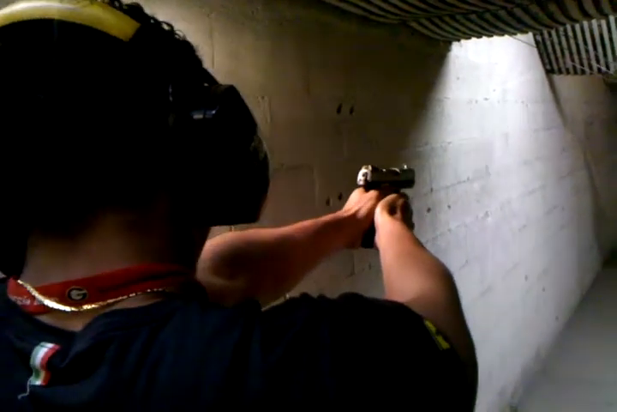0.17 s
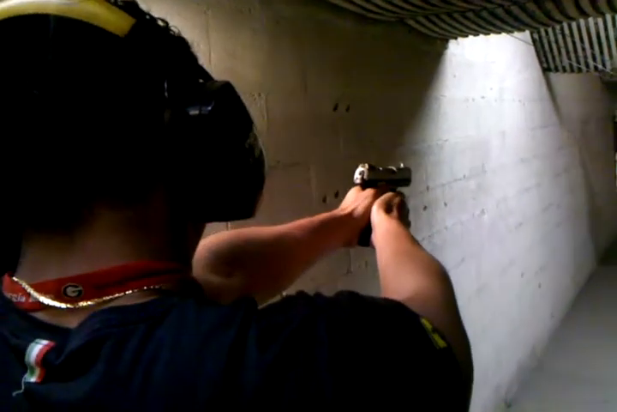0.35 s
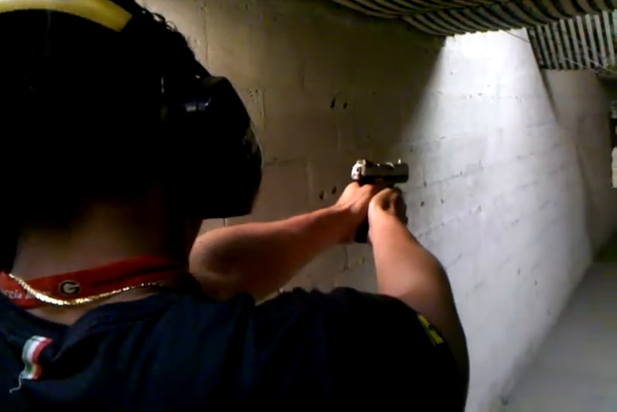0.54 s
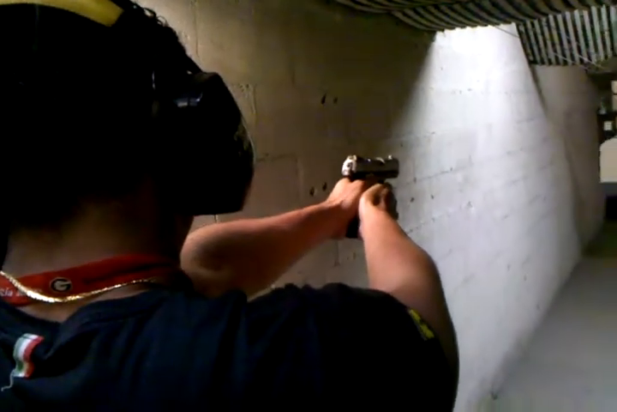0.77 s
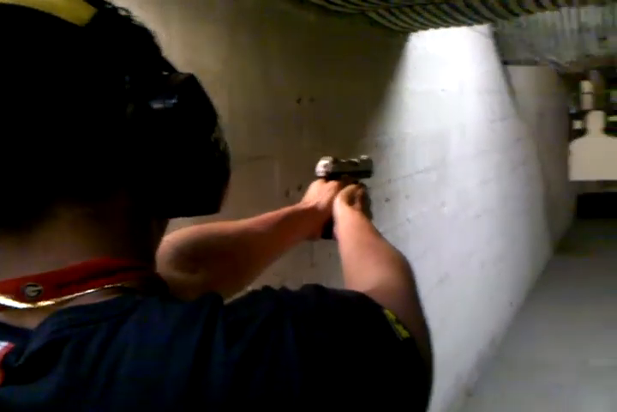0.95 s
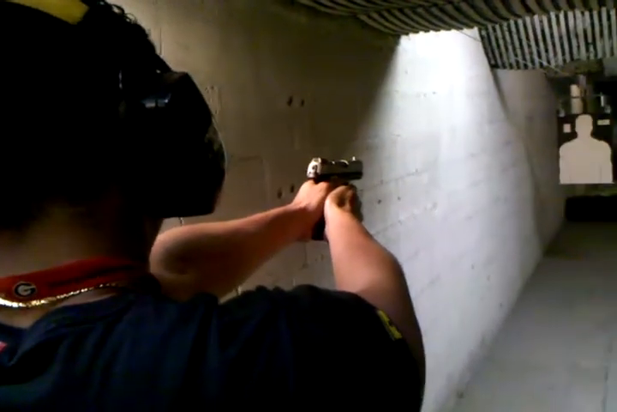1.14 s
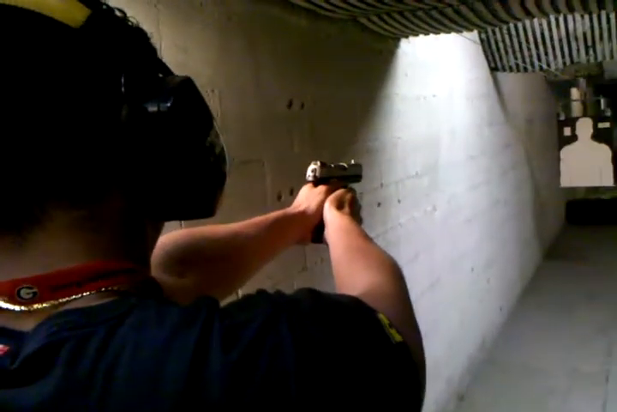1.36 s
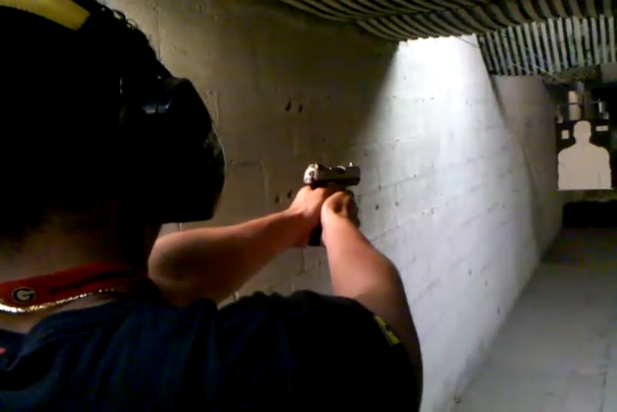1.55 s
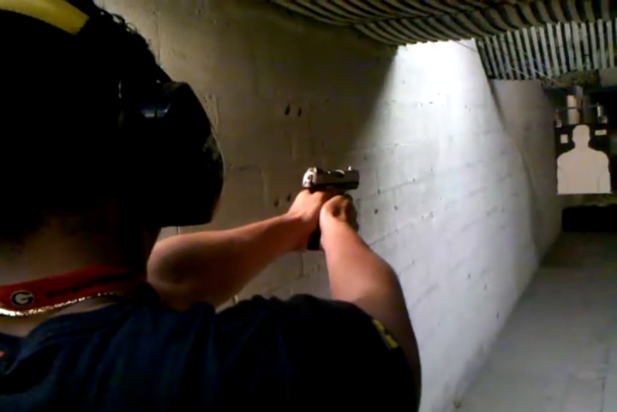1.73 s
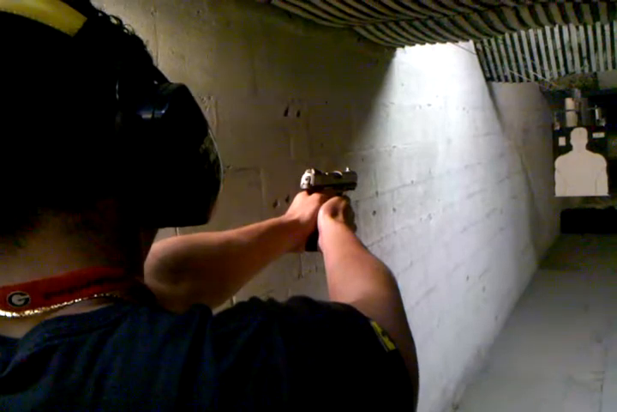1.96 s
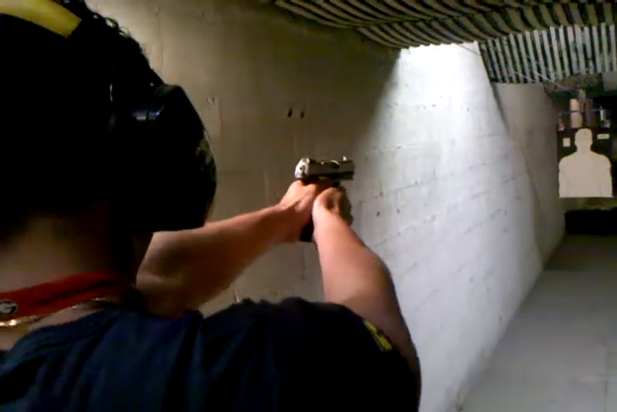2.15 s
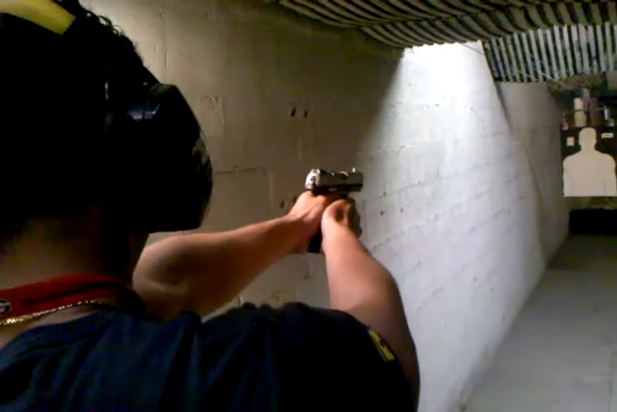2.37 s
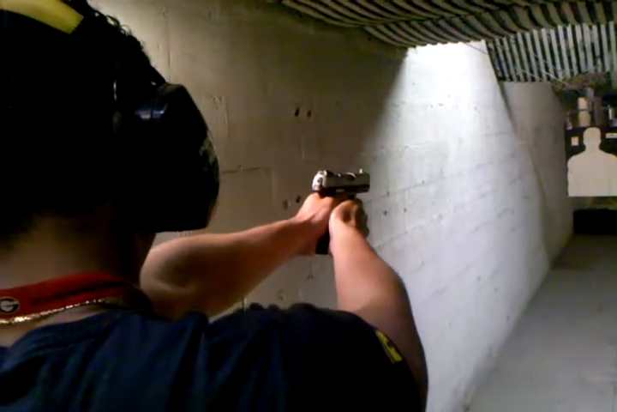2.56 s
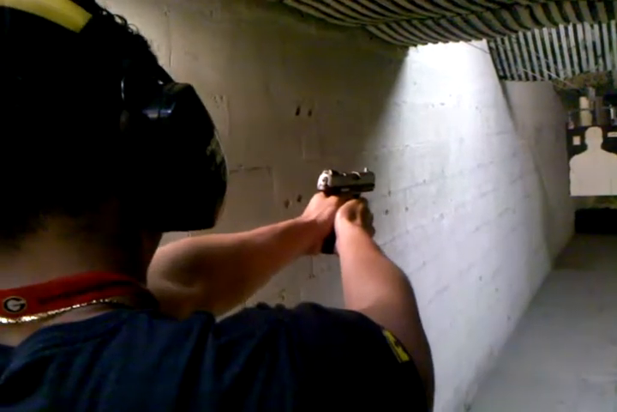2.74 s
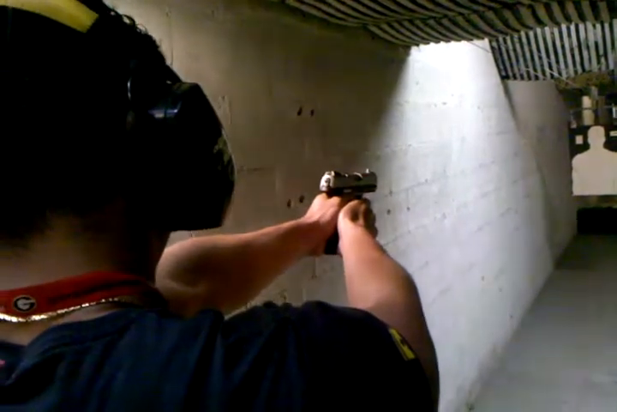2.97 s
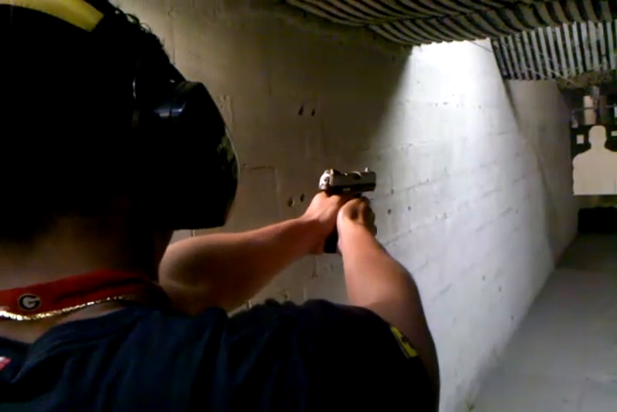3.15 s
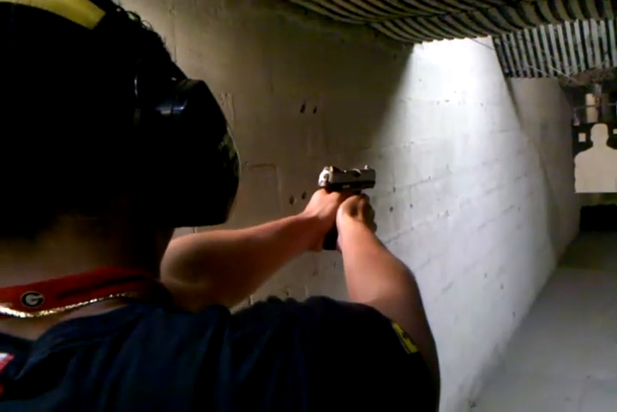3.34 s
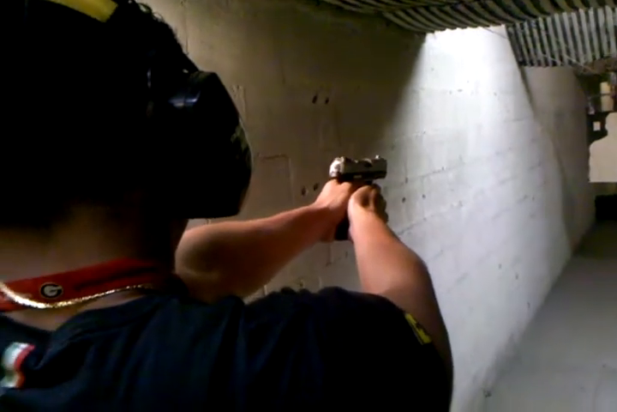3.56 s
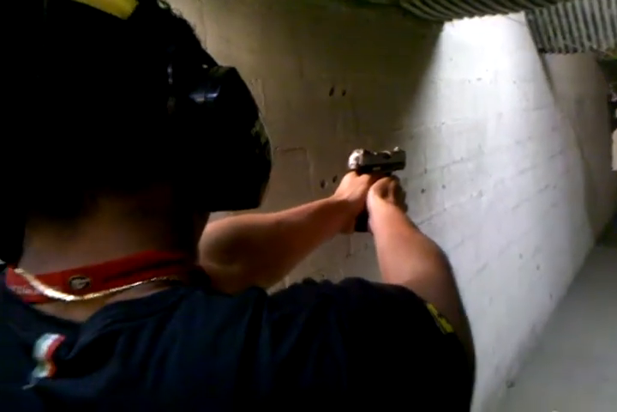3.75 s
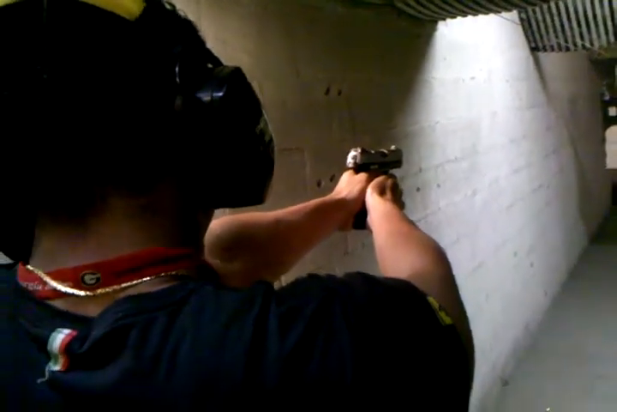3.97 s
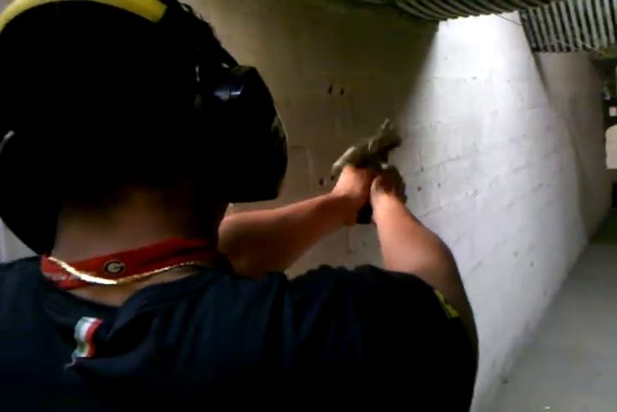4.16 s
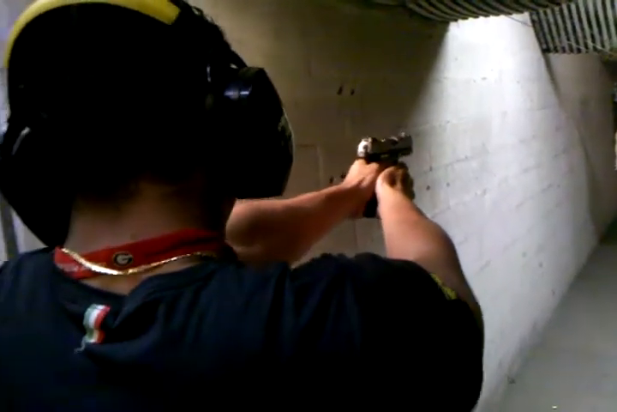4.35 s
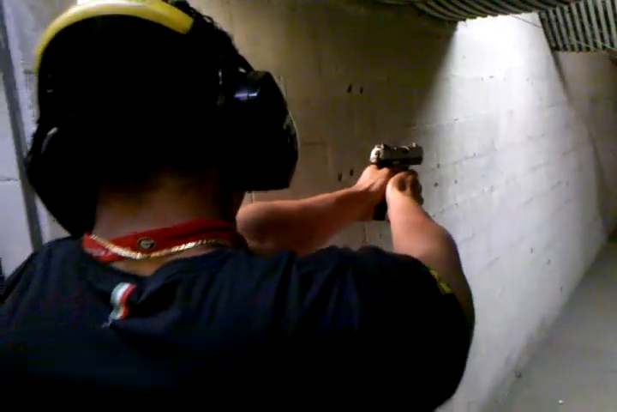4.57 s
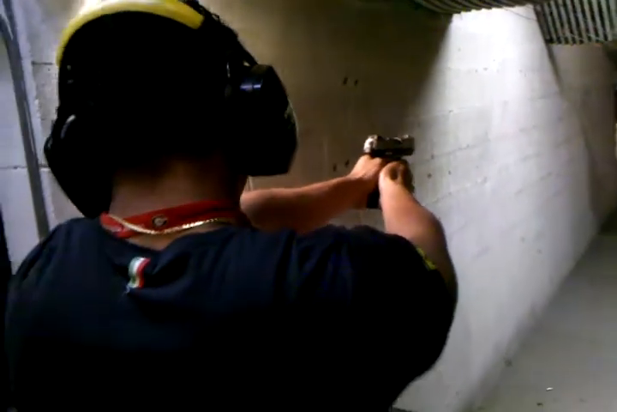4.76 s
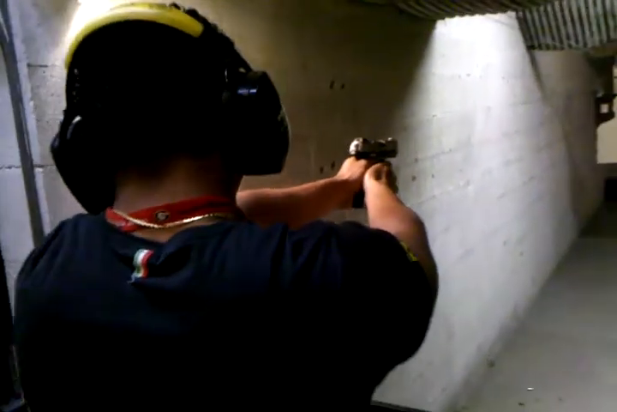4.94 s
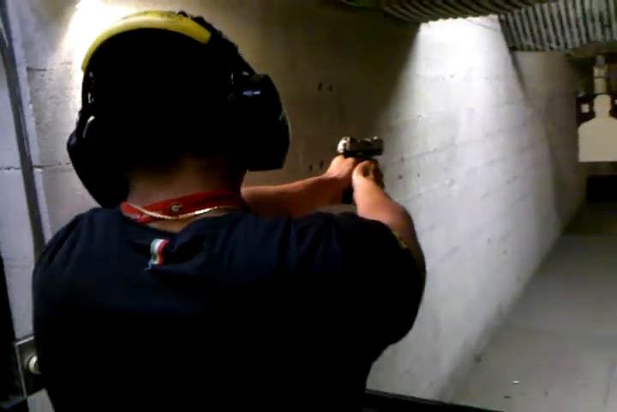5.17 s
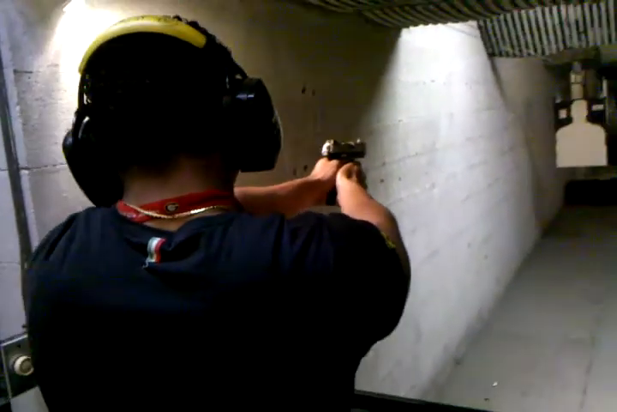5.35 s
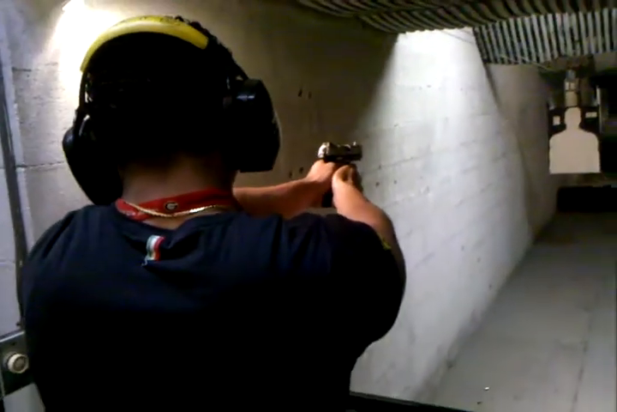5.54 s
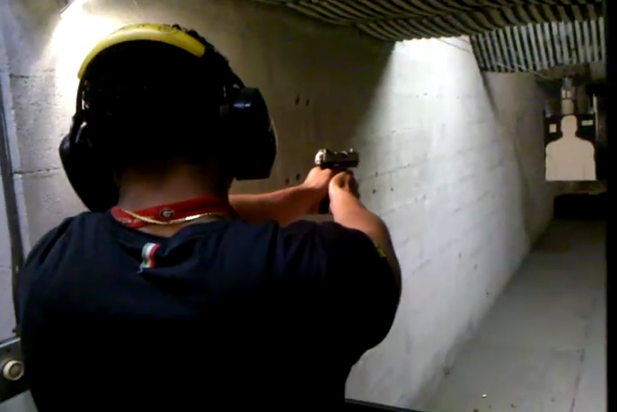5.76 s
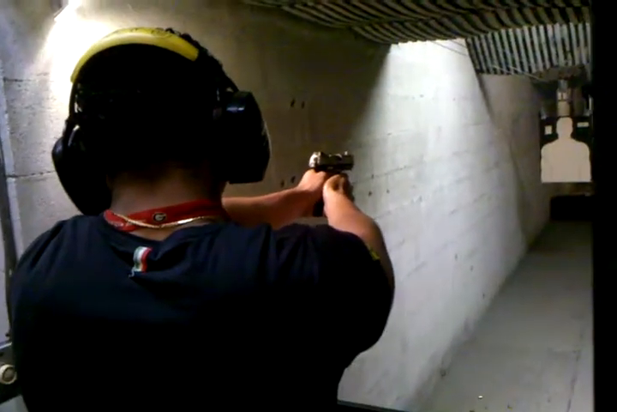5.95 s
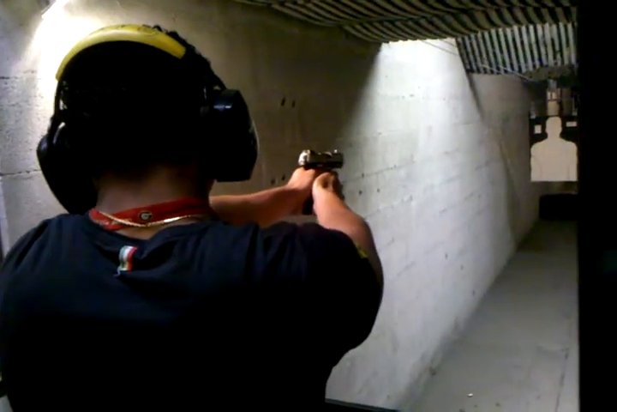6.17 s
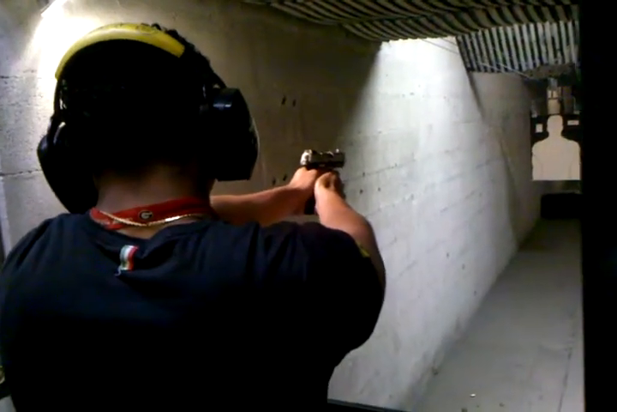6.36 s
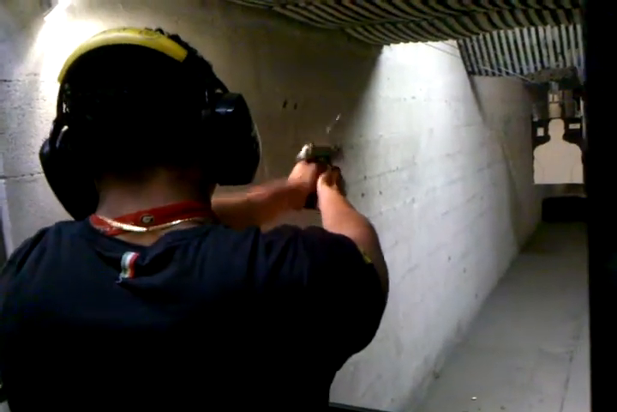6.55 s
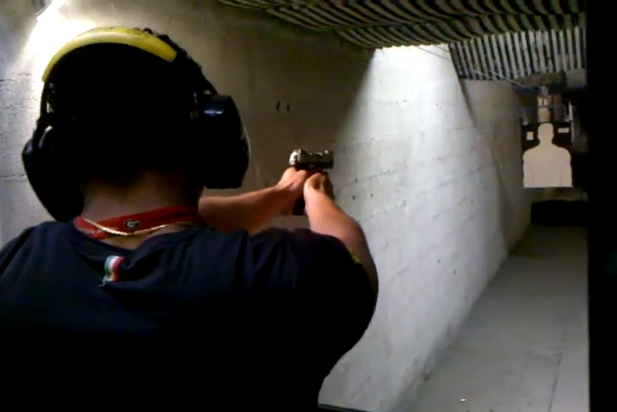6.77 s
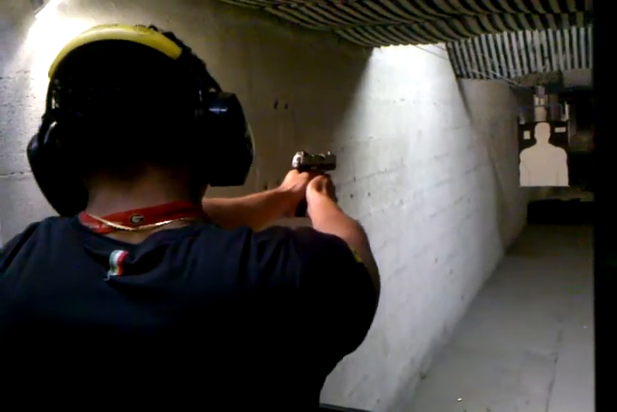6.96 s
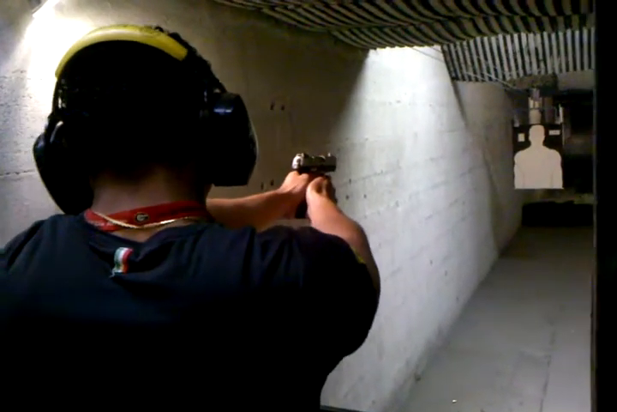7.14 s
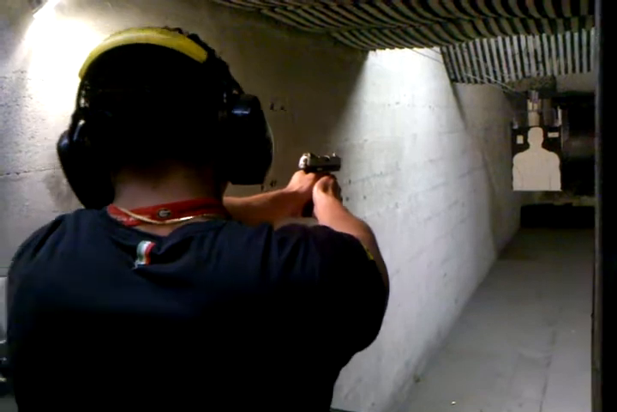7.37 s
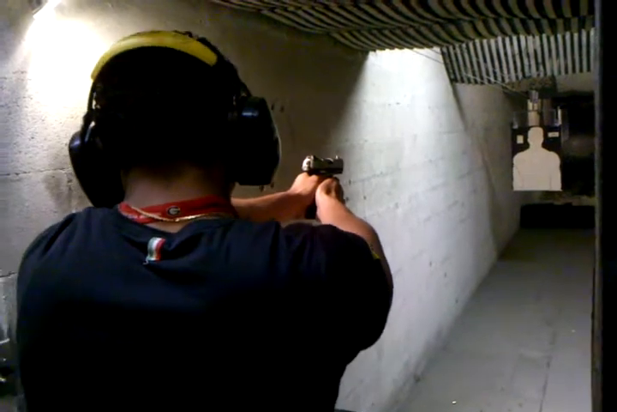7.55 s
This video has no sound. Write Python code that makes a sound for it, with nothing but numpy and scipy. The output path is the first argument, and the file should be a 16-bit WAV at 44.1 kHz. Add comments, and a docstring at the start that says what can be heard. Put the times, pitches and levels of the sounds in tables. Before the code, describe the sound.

The sound opens inside the loud echo of a pistol shot just fired in an indoor concrete range. A spent brass casing clinks and bounces on the floor from about 0.2 to 0.8 seconds, then ticks and rolls faintly. The pistol fires again at about 2.0, 4.1 and 6.4 seconds. Each shot has a faint trigger click just ahead of it, a bright crack, and a swelling echo that overloads the small, close microphone for half a second before ringing away. Casings bounce lightly from 2.8 to 3.3 seconds. One lands sharply at 4.7 seconds, with more clinks and a soft roll until about 6 seconds, and a few last light clinks come around 7.3 to 7.5 seconds. A faint, low ventilation hum runs throughout, showing as the echoes die. The whole sound is somewhat narrow, without deep bass or very high treble.

```python
"""A long concrete shooting lane, heard from the firing booth through a small microphone.
We come in on the echoes of a pistol shot fired just before the start. Spent brass bounces and rolls
on the floor, and the low rumble of the ventilation shows as the echoes die. Three more shots follow
about two seconds apart, each with a faint trigger click, a bright crack, echoes that overload
the microphone for half a second, and then more clinking casings."""
import sys
import numpy as np
from scipy import signal
from scipy.io import wavfile

SR = 44100
rng = np.random.default_rng(int(sys.argv[2]) if len(sys.argv) > 2 else 0)


def inscribe(sig):
    """Save sig as 16-bit PCM at rate SR to the path in sys.argv[1].

    A 1-D sig is mono; a 2-D sig holds one channel per row.
    Samples are clipped to [-1, 1] before scaling.
    """
    pcm = np.round(np.clip(np.atleast_2d(sig).T, -1, 1) * 32767)
    wavfile.write(sys.argv[1], SR, pcm.astype(np.int16))


N = 335601


def gain_of(db):
    """Decibels to an amplitude factor."""
    return 10 ** (np.asarray(db) / 20)


def unit_rms(x):
    """Scales a signal to an rms of one."""
    return x / np.sqrt(np.mean(x ** 2) + 1e-20)


def curve(table, hz, column=1):
    """One column of a table, interpolated on a log-frequency axis."""
    columns = np.transpose(table)
    return np.interp(np.log(hz + 1), np.log(columns[0] + 1), columns[column])[:, None]


def add(mix, start_s, sound):
    """Mixes a sound in at start_s, which may lie before the start."""
    at = round(start_s * SR)
    sound = sound[max(-at, 0):]
    part = mix[max(at, 0):][:len(sound)]
    part += sound[:len(part)]


def noise(magnitude, count):
    """Noise whose spectrum follows magnitude(t, hz)."""
    t = np.arange(count // 256 + 5) * 256 / SR
    hz = np.fft.rfftfreq(1024, 1 / SR)
    real, imag = rng.standard_normal((len(t), len(hz), 2)).T
    return signal.istft((real + 1j * imag) * magnitude(t, hz), nperseg=1024, noverlap=768)[1][:count]


def crack(t):
    """The pistol close by: a bright burst before the lane fills with echoes."""
    # spectrum of the crack: frequency_hz, density_db
    spectrum = [(88, -34), (150, -8), (1470, -3.5), (2130, -2), (3400, -1), (5410, -3.5), (6250, -1.5),
                (7000, -6.5), (9100, -37), (15400, -120)]
    level_db, t60_s = -5.5, .4
    burst = unit_rms(noise(lambda t, hz: gain_of(curve(spectrum, hz)), count=len(t)))
    return gain_of(level_db - 60 * t / t60_s) * burst


def lane_echoes(t, hz):
    """Echo spectrum over time: treble arrives at once and dies first; bass piles up and lingers."""
    # colour of the echoes: frequency_hz, density_db
    spectrum = [(60, -25), (130, -24), (250, -14.5), (340, -5), (430, -3.5), (700, -2), (1100, -2.5),
                (1900, -11), (2900, -16.5), (4500, -19.5), (6600, -23.5)]
    # how the lane empties and fills: frequency_hz, t60_s, build_up_s
    lane = [(100, 1.2, 0.17), (300, 0.93, 0.16), (700, 0.89, 0.23), (1500, 0.86, 0.078), (3000, 0.89, 0.02),
            (5250, 0.72, 0.011), (7350, 0.65, 0.012)]
    # weaker, slower tail from the far end: frequency_hz, density_db
    far_end = [(200, -66.5), (350, -55), (1000, -51.5), (1600, -47.5), (2100, -63), (2900, -53.5),
               (4000, -65), (6000, -82)]
    far_t60_s = 2.435
    colour = gain_of(curve(spectrum, hz))
    build_up = 1 - 0.72 * np.exp(-t / curve(lane, hz, column=2))
    near = colour * build_up * gain_of(-60 * t / curve(lane, hz))
    far = gain_of(curve(far_end, hz) - 60 * t / far_t60_s)
    return np.hypot(near, far) / np.linalg.norm(colour)


def standing_waves(t):
    """Each standing wave in the lane is a cluster of close partials that beat as they die."""
    # lingering resonances: pitch_hz, width_hz, relative_db, t60_s
    lane_modes = [(327.8, 30, -21, 1.175), (745, 68, -50, 1.9), (919, 17, -53, 2.3), (990, 38, -52, 2.02)]
    build_up_s = 0.082
    out = np.zeros(len(t))
    for hz, width, db, t60 in lane_modes:
        detune, phase = rng.random((16, 2, 1)).transpose(1, 0, 2)
        partial_hz = hz + 2 * width * (detune - .5)
        cluster = np.sin(2 * np.pi * (partial_hz * t + phase)).sum(0)
        out += gain_of(db - 60 * t / t60) * unit_rms(cluster)
    return out * (1 - np.exp(-t / build_up_s))


def pistol_shots():
    """Each shot cracks, then its echoes pile up far above the crack."""
    # shots: start_s
    shot_times = [-.35, 1.9673, 4.111, 6.4461]
    echo_gain_db, fill_s, onset_s = 23, .15, .005
    out, t = np.zeros(N), np.arange(3 * SR) / SR
    onset = gain_of(-45 * np.maximum(1 - t / onset_s, 0))
    filling = np.minimum(t / fill_s, 1) ** 1.5
    for start_s in shot_times:
        direct = crack(t)
        echoes = noise(lane_echoes, count=len(t)) + standing_waves(t)
        add(out, start_s - onset_s, onset * (direct + gain_of(echo_gain_db) * filling * echoes))
    return out


def ventilation():
    """Steady air noise, strongest in the bass."""
    # spectrum of the moving air: frequency_hz, density_db
    air = [(35, -74.5), (60, -43), (128, -4), (215, -1.5), (295, -25.5), (398, -10.5), (431, -25.5),
           (709, -17.5), (799, -27), (937, -20), (7000, -44.5), (9100, -90), (15400, -120)]
    return gain_of(-53) * unit_rms(noise(lambda t, hz: gain_of(curve(air, hz)), count=N))


def clink(peak_db, hardness, spread_octaves=.95, rattle_s=.0024):
    """A sharp contact and a rattle drive heavily damped modes; harder blows ring higher."""
    # modes of brass on concrete: pitch_hz, level_db, t60_s
    brass = [(1400, 0, .0035), (1900, 0, .0035), (2400, 0, .003), (3080, 0, .004), (3650, 0, .0025),
             (4300, 0, .0025), (5050, 0, .0025), (5800, 0, .0022), (6500, 1, .0025), (7200, 0, .0022)]
    hz, mode_db, t60 = np.transpose(brass)[:, :, None]
    t = np.arange(12000) / SR
    ring_t = t[:1000]
    sign = (-1) ** np.arange(len(brass))[:, None]  # neighbouring modes swing in opposite senses
    centre_hz = 1200 * 6 ** hardness
    share = .07 + np.exp(-.5 * (np.log2(hz / centre_hz) / spread_octaves) ** 2)
    detuned_hz = hz * (1 + .015 * rng.standard_normal(hz.shape))
    ring = sign * share * gain_of(mode_db - 60 * ring_t / t60) * np.sin(2 * np.pi * detuned_hz * ring_t)
    ring *= np.minimum(ring_t * hz, 1)  # each mode builds over one cycle, so no thud leaks below it
    blows = rng.standard_normal(len(t)) * np.exp(-t / rattle_s) * np.minimum(t / .0015, 1)
    blows[0] = 8.5  # the first contact
    sound = signal.oaconvolve(blows, ring.sum(0))
    return gain_of(peak_db) * sound / abs(sound).max()


def bouncing_casings():
    """Spent brass lands and bounces on the concrete, one clink a contact."""
    # contacts: start_s, peak_db, hardness (0-1), spread_octaves
    bounces = [(.1865, -5.5, .9, .22), (.205, -11, .38, .42), (.345, -27, .68, .2), (.4275, -22, .74, .25),
               (.4948, -16, .2, .5), (.5472, -28, .6, .8), (.648, -31, .2, .5), (.7526, -13, .5, .7),
               (.8206, -21, .53, .1), (1.338, -55, .83, .28), (1.531, -45, .95, .6),
               (2.7597, -25, .75, .37), (3.079, -35.5, .82, .4), (3.2027, -45, .87, .4),
               (3.286, -52, .88, .3), (3.335, -54, .9, .3), (4.7148, -1, .3, 1.05), (5.069, -47, .99, .15),
               (5.089, -50, .95, .15), (5.152, -50, .95, .15), (5.312, -15.5, .77, .35),
               (5.5912, -15, .55, 1.2), (5.8002, -22, .5, 1.1), (5.93, -43, .15, .5),
               (7.2565, -27, .86, .25), (7.478, -50, .92, .15), (7.507, -46, .95, .15),
               (7.523, -50, .92, .2)]
    out = np.zeros(N)
    for start_s, peak_db, hardness, spread_octaves in bounces:
        add(out, start_s, clink(peak_db, hardness, spread_octaves))
    return out


def booth(x):
    """Single wall echoes, then a diffuse tail that is shorter in the treble."""
    # echoes off the near walls and the far wall: delay_s, level_db
    walls = [(.0045, -7), (.009, -20), (.014, -16), (.02, -22), (.071, -19.5)]
    tail_db, mid_t60_s = -4.5, 0.71  # decay time at 2500 Hz
    tail = noise(lambda t, hz: gain_of(-60 * t / (mid_t60_s * np.sqrt(3000 / (hz[:, None] + 500)))), SR)
    tail[:200] = 0  # silent until the nearest wall answers
    response = gain_of(tail_db) * tail / np.linalg.norm(tail)
    response[0] = 1  # direct sound
    for delay_s, db in walls:
        response[round(delay_s * SR)] += gain_of(db)
    return signal.oaconvolve(x, response)[:N]


def rolling_casings():
    """A casing rolling on the floor draws its rattle out."""
    # rolls: start_s, peak_db, hardness (0-1), rattle_s
    rolls = [(1.726, -39.5, .4, .039), (5.196, -48, .95, .037), (5.85, -46, .1, .13)]
    out = np.zeros(N)
    for start_s, peak_db, hardness, rattle_s in rolls:
        add(out, start_s, clink(peak_db, hardness, rattle_s=rattle_s))
    return out


def trigger_clicks():
    """The trigger gives a dull metal click just ahead of the shot."""
    # trigger pulls: start_s, peak_db
    pulls = [(1.947, -38), (4.0862, -40), (6.423, -46)]
    out = np.zeros(N)
    for start_s, peak_db in pulls:
        add(out, start_s, clink(peak_db, hardness=.15))
    return out


def scene():
    """At the booth, in mono: shots, small metal sounds off the walls, and air."""
    shots = pistol_shots()
    metal = bouncing_casings() + trigger_clicks() + rolling_casings()
    return (shots + booth(metal) + ventilation())[None]


def low_pass(x, hz, taps):
    """Linear-phase low-pass."""
    return signal.oaconvolve(x, signal.firwin(taps, hz, window=("kaiser", 10), fs=SR)[None], "same")


def record(dry):
    """A small, narrow-band microphone clips on the shots and feeds a low-sample-rate recorder."""
    bass_hz, treble_hz, coupling_hz, sample_hz = 110, 7180, 94, 16000
    mic_limit, output_limit = gain_of(-3.2), gain_of(-3.1)
    band = signal.sosfilt(signal.butter(4, bass_hz, "high", fs=SR, output="sos"), dry)
    band = low_pass(band, treble_hz, taps=91)
    clipped = np.clip(band, -mic_limit, mic_limit)
    # a coupling capacitor makes the flat tops droop
    coupled = signal.lfilter(*signal.butter(1, coupling_hz, "high", fs=SR), clipped)
    stored = low_pass(coupled, hz=7980, taps=101)
    # the low sample rate leaves a faint mirror image just above the top of the band
    mirror = 1 + 2 * np.cos(2 * np.pi * sample_hz * np.arange(N) / SR)
    imaged = low_pass(stored * mirror, hz=7880, taps=91)
    # overshoots are shaved off, which spreads faint clicks up to the band limit
    shaved = np.clip(imaged, -output_limit, output_limit)
    return low_pass(shaved, hz=15800, taps=511)


dry = scene()
out = record(dry)
inscribe(out)
```